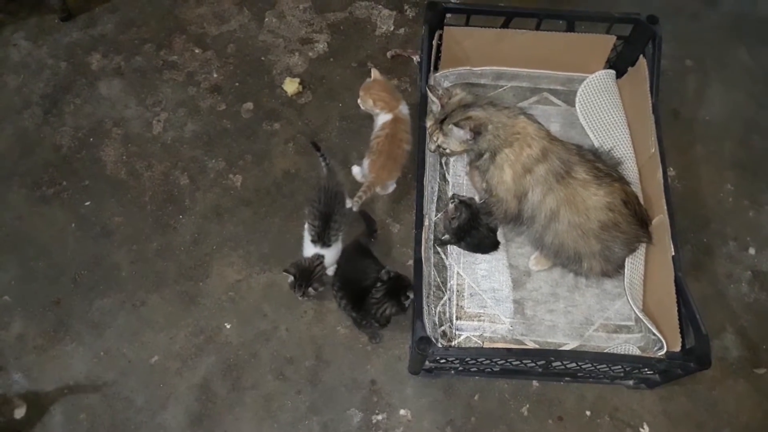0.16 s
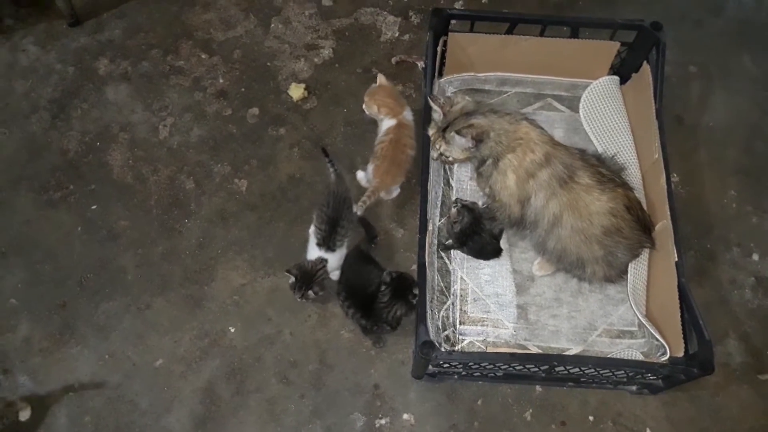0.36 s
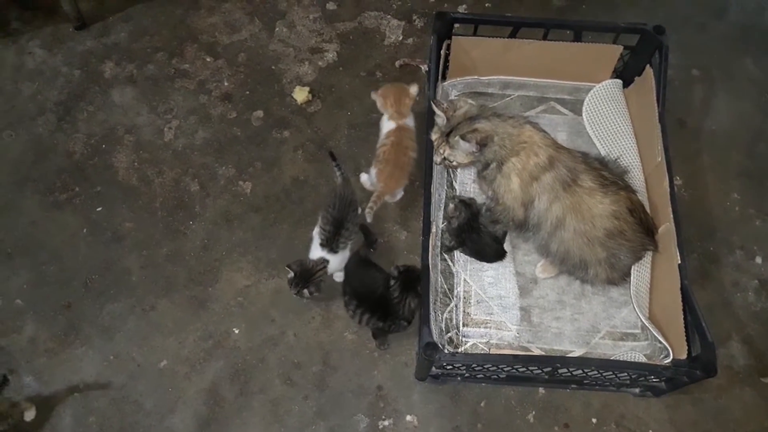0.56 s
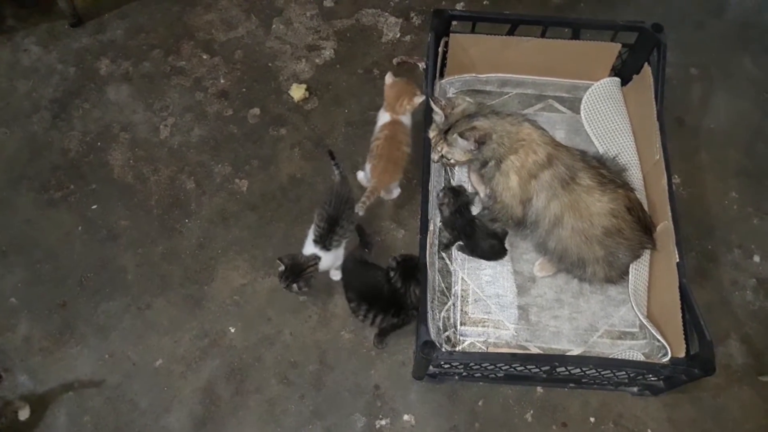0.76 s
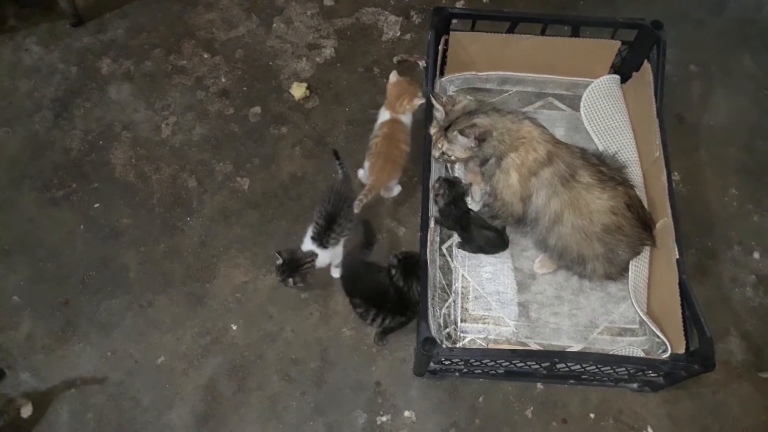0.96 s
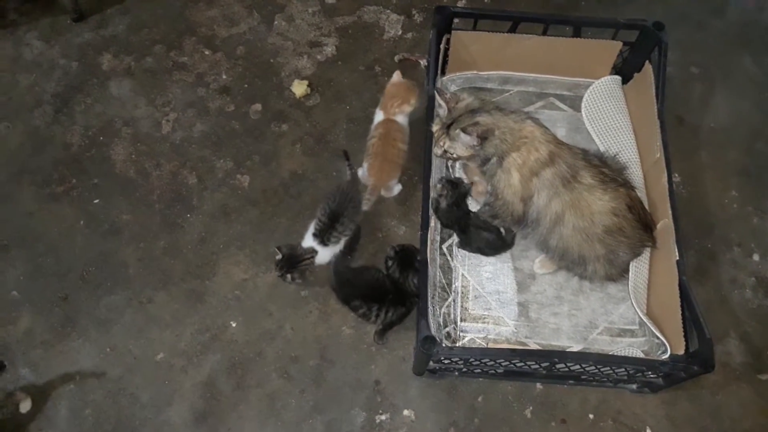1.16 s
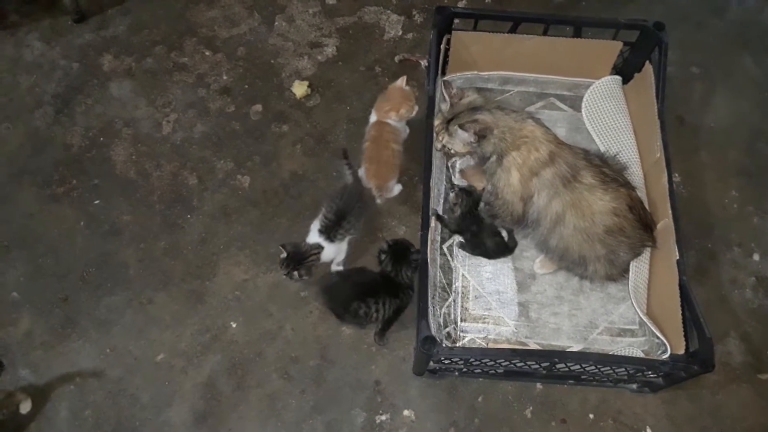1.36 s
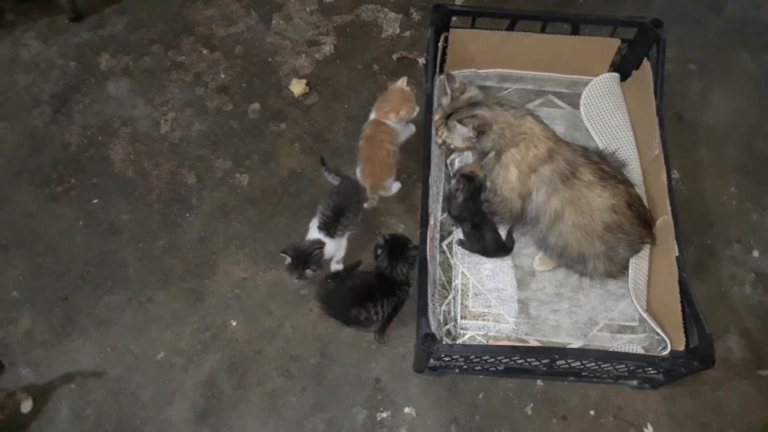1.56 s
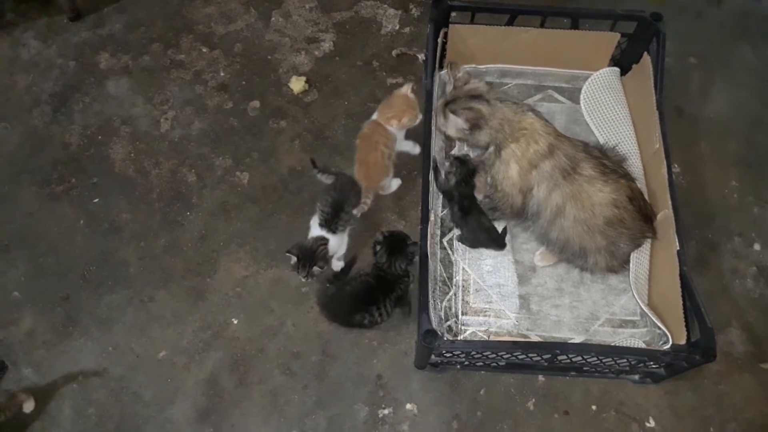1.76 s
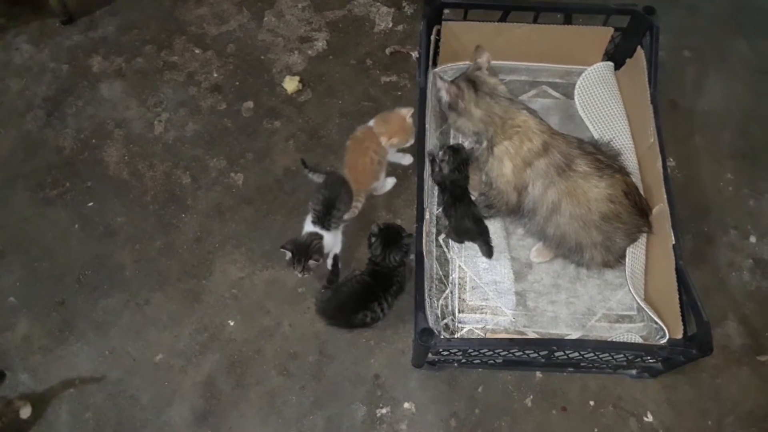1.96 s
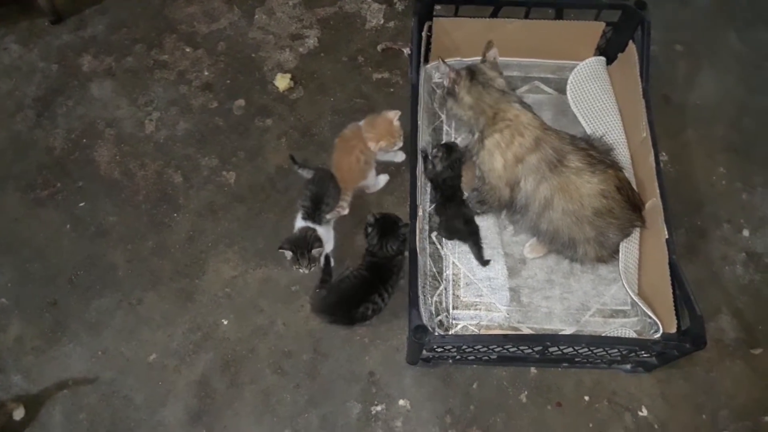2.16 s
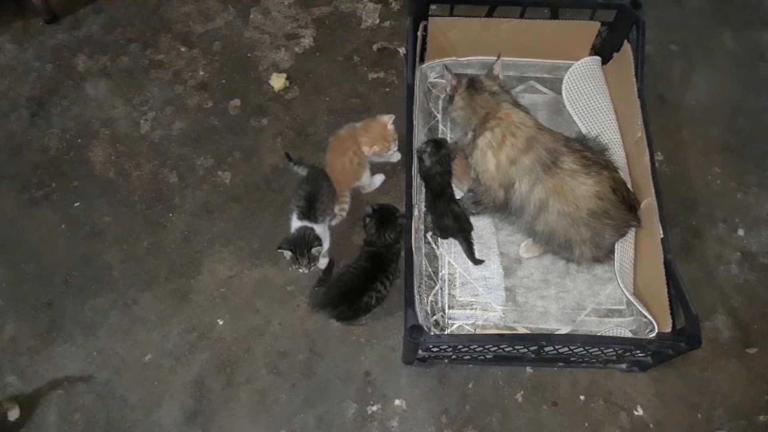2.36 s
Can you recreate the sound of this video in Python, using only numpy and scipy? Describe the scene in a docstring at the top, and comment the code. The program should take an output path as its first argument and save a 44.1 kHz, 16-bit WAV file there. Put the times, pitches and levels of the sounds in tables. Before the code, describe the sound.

Kittens mewing in a bare hard-floored room: a high piercing mew overlapped by a lower one, a very faint one, soft bedding rustle and paw bumps, then a sharp claw scrape running into a hoarse mew.

```python
"""Kittens mew on a hard floor beside a lined crate in a bare room: two mews overlap, a faint one follows,
then claws scrape the lining and a hoarse mew comes out of the scrape. Mews are stacks of jittering
harmonics plus air noise; claws are noise broken into short catches and snags. Bedding rustles as soft
noise, paws push the crate's ringing modes, and filtered noise makes the low room hum and microphone hiss."""
import sys
import numpy as np
from scipy import signal
from scipy.fft import rfft, irfft
from scipy.io import wavfile

SR = 44100
rng = np.random.default_rng(int(sys.argv[2]) if len(sys.argv) > 2 else 0)


def to_wav(s):
    """Save 16-bit WAV."""
    ch = np.atleast_2d(s).T  # columns
    pcm = np.round(np.clip(ch, -1, 1) * 32767)  # PCM
    wavfile.write(sys.argv[1], SR, pcm.astype(np.int16))


N = 105840  # 2.4 s

# Steady room hum and microphone hiss, then a faint separate noise, opposite in left and right.
# Each row: frequency in Hz, relative level in dB.
HUM_SPECTRUM = [(25, -21), (60, -6), (110, 3), (150, -2), (250, -14), (400, -20.5), (800, -16),
                (1500, -18.5), (2800, -21.5), (4800, -20.5), (6500, -24.5), (8000, -28.5), (10500, -30.5),
                (12500, -24.5), (14200, -21), (15800, -17.5)]
SIDE_NOISE_SPECTRUM = [(25, -12), (120, 0.5), (300, -5), (700, -8), (2000, -14), (8000, -6.5),
                       (15800, -5.5)]
HUM_DB, SIDE_NOISE_DB = -67.5, -12.5  # side noise relative to the hum and hiss
# Coming and going of the low rumble. Each row: time in seconds, level in dB relative to STIR_DB.
STIR_LEVELS = [(0, 6.5), (.4, 2), (.75, -1), (.88, 11.5), (1.0, 9.5), (1.3, 0), (1.37, 7), (1.42, -1.5),
               (1.56, 13), (1.62, 5), (1.7, -4), (1.9, -2.5), (2.4, 1.5)]
STIR_LOW_HZ, STIR_HIGH_HZ, STIR_DB = 189, 465, -78

ROOM_T60_S, ROOM_TREBLE_T60_S, ROOM_TREBLE_DB = 0.34, 0.27, 2
ROOM_DB, WALL_CUT_HZ = -12, 3000  # echo level; split between low and treble echoes
CUTOFF_HZ = 15860

# Paws on the crate. Each row: start in seconds, strength of the push in dB.
PAW_PATS = [(1.3771, -44.5), (1.5781, -50)]
# Modes of the crate. Each row: frequency in Hz, relative level in dB, 60 dB decay in seconds.
CRATE_MODES = [(227.9, -9, 0.12), (309, 3, 0.17), (400, -5, 0.09), (560, 1, 0.048), (690, 0.5, 0.029),
               (1340, -6.5, 0.087)]
PAD_HZ = 1300  # upper edge of the soft push

# Soft shifting of the bedding. Each row: time in seconds, level in dB.
RUSTLE_LEVELS = [(.9, -70), (.96, -71.5), (1.2, -72.5), (1.25, -71), (1.29, -63), (1.33, -60.5),
                 (1.38, -57.5), (1.44, -68), (1.5, -67), (1.6, -113)]
# Colour of the bedding noise. Each row: frequency in Hz, relative level in dB.
BEDDING_SPECTRUM = [(1000, -10.5), (1400, -5), (1700, -5), (2100, -13.5), (3300, -12.5), (4300, -2),
                    (4900, -7.5), (5650, -1.5), (6400, -9.5), (8300, -4.5), (10300, -19.5), (14000, -12.5),
                    (15800, -5)]

# Claws snagging. Each row: start in seconds, strength in dB, pitch in Hz, 60 dB decay in seconds.
CLAW_SNAGS = [(1.126, -50.5, 2484, 0.013), (1.126, -52, 1850, 0.011), (1.145, -60.5, 2370, 0.066),
              (1.758, -40, 2380, 0.031), (1.762, -41, 4350, 0.022), (1.769, -40, 7200, 0.025),
              (1.781, -37.5, 5330, 0.016), (1.79, -33, 5150, 0.026), (1.7996, -33.5, 4270, 0.037),
              (1.798, -36, 13800, 0.017), (1.8045, -32.5, 5340, 0.017), (1.806, -39, 13900, 0.018),
              (1.813, -43, 1700, 0.016), (1.8205, -29, 15500, .012), (1.823, -40, 4200, 0.017),
              (1.833, -28, 13800, 0.011), (1.848, -30.5, 6820, 0.047), (1.861, -32, 4200, 0.031),
              (1.87, -31.5, 6960, 0.016), (1.909, -33, 2350, 0.049), (1.91, -38, 5700, 0.0067)]
SNAG_WIDTH, SNAG_CRACK_DB = 0.16, -8  # band width as a share of pitch; broad crack relative to the band

# Claws rubbing the lining. Each row: time in seconds, force in dB, treble gain in dB.
SCRAPE_FORCE = [(1.741, -43, -25), (1.745, -51.5, -27), (1.756, -54.5, -22), (1.759, -49.5, 3),
                (1.77, -44, 0), (1.785, -53.5, 4), (1.8, -45.5, 0), (1.815, -41.5, 0.5), (1.84, -41.5, 0.5),
                (1.85, -43.5, -3), (1.875, -45, 0), (1.89, -57, 4), (1.905, -58, 9), (1.93, -57.5, 6),
                (1.98, -67, 2), (2.06, -78, 8), (2.1, -90, 0)]
TREBLE_HZ = 9300  # the treble gain works above this
# Colour of the rubbed lining. Each row: frequency in Hz, relative level in dB.
LINING_SPECTRUM = [(290, -56), (500, -20.5), (878, -8.5), (1000, -9), (1660, -1), (2000, -7), (3770, 0),
                   (4110, -4), (4890, -1.5), (5730, -5), (11300, -11.5), (13600, -19), (15700, -7.5)]
# Broad resonances of the lining. Each row: centre in Hz, width in Hz, relative level in dB.
LINING_RESONANCES = [(850, 340, -5.5), (1700, 560, 0.5), (2410, 200, 2), (4200, 580, 9), (5680, 260, 6.5),
                     (6900, 670, -7), (8500, 1100, 0.5), (13900, 2300, 8)]
RINGS_DB = -5  # resonances relative to the plain rub
CATCHES_PER_S, CATCH_SPREAD_DB, CATCH_S = 500, 3.5, .0012  # rate, scale of uneven strength, decay time
CATCH_SHARE = .55  # weight of the catches; the rest is steady rub

# The four mews. Each row: time in seconds, pitch in Hz, fundamental in dB, second harmonic in dB,
# higher harmonics in dB before the mouth colour, roughness from 0 to 1, air noise in dB.
HIGH_MEW = [(.155, 993.5, -71, -75, -100, 0.09, -95), (.178, 1039, -65, -58.5, -100, .1, -78),
            (.184, 1063, -65.5, -72, -64, 0.17, -83), (.21, 1149, -65.5, -55, -55, 0.2, -64),
            (.24, 1132, -63.5, -50.5, -50, 0.01, -75), (.262, 1212, -64, -52, -51.5, 0, -54),
            (.29, 1325, -71, -40, -57, 0.04, -49.5), (.312, 1335, -55, -33.5, -56.5, 0, -53),
            (.328, 1363, -74, -48, -62, 0, -60), (.36, 1380, -51, -54.5, -65.5, 0.02, -61),
            (.41, 1464, -47, -64, -60, 0, -74), (.416, 1515, -38.5, -75, -63, 0, -79),
            (.426, 1706, -56, -81, -65.5, 0, -74), (.44, 1712, -50, -85, -61.5, .04, -83),
            (.47, 1715, -50.5, -79, -60.5, 0, -80), (.5, 1712, -46, -73, -64.5, 0.02, -89),
            (.57, 1700, -60.5, -73, -67.5, 0, -90), (.63, 1671, -62.5, -84, -64, 0.01, -100),
            (.7, 1607, -44.5, -73, -74, 0, -88), (.765, 1560, -41, -67, -76, 0.01, -98),
            (.785, 1537, -45, -62, -82, 0.01, -92), (.797, 1581, -47.5, -79, -80, 0, -95),
            (.812, 1525, -53, -67, -80, 0.01, -95), (.84, 1479, -44.5, -71, -87, 0.07, -93),
            (.875, 1431, -49, -74, -75, 0.13, -92), (.9, 1355, -47.5, -85, -73, 0, -92),
            (.918, 1260, -41, -87, -83, 0.04, -85), (.945, 1203, -66.5, -88, -86, 0.3, -85),
            (.965, 1203, -72, -96, -97, .4, -95), (1.0, 1300, -74, -103, -100, .4, -99),
            (1.06, 1277, -73, -99, -105, 0.53, -99)]
LOW_MEW = [(.48, 850, -76, -78, -79, 0.16, -90), (.5, 870, -66.5, -65, -101, 0.1, -86),
           (.536, 935, -73, -56, -67.5, 0.072, -78), (.546, 965, -59.5, -66, -67.5, 0.17, -65),
           (.549, 1144, -65, -59, -59.5, 0.035, -68), (.575, 1131, -66.5, -52, -60, 0.012, -72),
           (.591, 1162, -58.5, -52.5, -56, 0.011, -81), (.631, 1114, -56.5, -49, -60.5, 0.022, -79),
           (.663, 1103, -57.5, -51.5, -61.5, 0.021, -86), (.675, 1084, -58, -52, -61, 0.033, -79),
           (.705, 1105, -58, -51.5, -63, 0.027, -81), (.749, 1034, -68, -57, -62, 0.025, -68),
           (.77, 1050, -86, -55, -64, 0.068, -82), (.775, 1153, -73, -52, -67, 0.1, -59),
           (.801, 1087, -61, -61, -68.5, 0.1, -66), (.843, 1116, -65, -62, -72.5, 0.14, -63),
           (.865, 1115, -80, -78, -75.5, 0.66, -69), (.9, 1127, -89, -93, -78, 1, -68),
           (.93, 1085, -88, -91, -84, 1, -76)]
FAINT_MEW = [(1.435, 1680, -77, -99, -99, .7, -99), (1.455, 1718, -67, -99, -102, .5, -99),
             (1.5, 1699, -75, -102, -111, 0.36, -99), (1.575, 1772, -76, -93, -110, 0.53, -99),
             (1.655, 1700, -90, -99, -99, 0.57, -99)]
HOARSE_MEW = [(1.77, 800, -82, -60, -65, 0.85, -80), (1.8, 798.8, -65, -50.5, -59, 0.75, -82),
              (1.82, 815.6, -60.5, -57, -70, 0.61, -66), (1.86, 838.2, -51.5, -62, -54, 0.78, -57),
              (1.89, 929, -60, -56, -56, 0.96, -73), (1.94, 942.4, -56, -60, -64.5, 0.97, -58.5),
              (1.98, 924.5, -60, -54.5, -64, 0.27, -61), (2.006, 947, -83, -52, -63, 0.12, -70),
              (2.016, 944, -53, -85, -71, .5, -71), (2.024, 870.4, -74, -58, -64, 0.31, -76),
              (2.04, 930, -62, -61, -66, 0.38, -72), (2.05, 891, -70, -57.5, -68, 0.42, -74),
              (2.062, 916, -65.5, -56, -65, 0.15, -83), (2.1, 825.5, -68.5, -58.5, -70.5, 0.11, -92),
              (2.122, 837, -74, -60, -70.5, .2, -75), (2.14, 785.6, -72, -53.5, -78, 0.13, -69),
              (2.15, 789, -89, -85, -78, 0.41, -78), (2.158, 893, -93, -55.5, -76.5, 0.52, -79),
              (2.174, 850, -86, -64, -71, 0.75, -88), (2.18, 776, -75, -63, -74, 0.22, -85),
              (2.188, 771, -84, -53.5, -84, 0.081, -70), (2.198, 829, -87, -54, -82, 0.14, -80),
              (2.206, 813, -92, -81, -78, 0.7, -80), (2.252, 791, -88, -75, -94, 0.59, -79),
              (2.28, 797, -96, -95, -89, 0.53, -97)]
# Mouth colour of the higher harmonics; the low and faint mews share one. Each row: frequency in Hz, gain in dB.
HIGH_MOUTH = [(3000, -15.5), (3600, 6), (4500, -26), (5100, -20), (5700, -10), (6300, -1.5), (6850, -3),
              (7500, 3), (8400, 1.5), (9300, -15), (10000, -9.5), (11500, -11.5), (13000, -29),
              (16000, -50)]
LOW_MOUTH = [(3000, 4), (4400, 6.5), (5500, 3.5), (6700, 4.5), (7900, -4.5), (9000, -27), (15000, -61)]
HOARSE_MOUTH = [(2400, 4), (3100, -11.5), (3700, -6.5), (4300, -8), (4800, -4.5), (5400, 5), (6200, -6),
                (7300, -5.5), (9000, -23), (15000, -42)]
# Air noise through a kitten's mouth. Each row: frequency in Hz, relative level in dB.
BREATH_SPECTRUM = [(1200, -54), (1500, -30), (2100, -16), (2750, -31.5), (3100, 1), (3600, 13), (4300, -6),
                   (5300, 8.5), (6200, 4), (7200, 4), (8500, -0.5), (10500, -19), (15800, -22)]
JITTER, ROUGH_JITTER, JITTER_HZ = 0.00463, .03, 65.2  # shares of pitch: always, added at full roughness; speed
WAVER_DB, WAVER_HZ, RASP_HZ = 0.5, 73, 324  # level waver and its speed; speed of the roughness
UNEVEN_DB, UNEVEN_HZ = 5, 9  # separate swell of each higher harmonic at full roughness
# The top harmonics fade faster than the others as a mew weakens: extra dB lost per dB below the threshold
SHRILL_HZ, SHRILL_FROM_DB, SHRILL_FOLLOWS = 9700, -56, 1.1
# Top hiss that follows the higher harmonics
SIZZLE_LOW_HZ, SIZZLE_HIGH_HZ, SIZZLE_DB = 12800, 16000, -14


def amp(db):
    """Decibels to a linear gain."""
    return 10 ** (np.asarray(db) / 20)


def rms_one(x):
    """Scale a signal to rms 1."""
    return x / np.sqrt(np.mean(x ** 2) + 1e-20)


def white():
    """White noise over the whole scene."""
    return rng.standard_normal(N)


def in_time(rows):
    """Draw a table's columns over time, after a gate that is 1 inside its span with 4 ms ramps."""
    s, *columns = np.transpose(rows)
    t = np.arange(N) / SR
    gate = np.clip(np.minimum(t - s[0], s[-1] - t) / .004, 0, 1)
    return [gate] + [np.interp(t, s, c) for c in columns]


def at_hz(points, hz):
    """Read a spectrum in dB at any frequency, along a log frequency axis."""
    table = np.array(points)
    return np.interp(np.log(hz), np.log(table[:, 0]), table[:, 1])


def drift(corner_hz):
    """Slow random wandering of rms 1: noise passed twice through a one-pole low-pass."""
    r = np.exp(-2 * np.pi * corner_hz / SR)
    noise = rng.standard_normal(N + SR)
    settled = signal.lfilter([1], [1, -2 * r, r * r], noise)[SR:]
    return rms_one(settled)


def colour(x, spectrum):
    """Shape a signal by a spectrum, with nothing far below its first point; rms 1."""
    hz = np.maximum(np.arange(N // 2 + 1) * SR / N, 1)
    gain = amp(at_hz(spectrum, hz)) * (hz > .7 * spectrum[0][0])
    return rms_one(irfft(rfft(x) * gain, N))


def band(x, low_hz, high_hz):
    """Keep one band of a signal."""
    edges = [low_hz, min(high_hz, .45 * SR)]
    return signal.sosfilt(signal.butter(2, edges, "band", fs=SR, output="sos"), x)


def split_at(x, hz, order):
    """Low and high parts of a signal."""
    return [signal.sosfilt(signal.butter(order, hz, kind, fs=SR, output="sos"), x) for kind in ("low", "high")]


def ring(push, hz, t60):
    """A mode struck by a push: a unit click sets a sine of height 1 ringing down."""
    r, w = amp(-60 / (t60 * SR)), 2 * np.pi * hz / SR
    return signal.lfilter([0, np.sin(w)], [1, -2 * r * np.cos(w), r * r], push + 1e-18)


def click(s, db):
    """A single-sample click."""
    out = np.zeros(N)
    out[int(s * SR)] = amp(db)
    return out


def floor():
    """Steady hum and hiss, the same on both sides, a faint noise opposite in left and right, a varying rumble."""
    hum = colour(white(), HUM_SPECTRUM)
    side_noise = colour(white(), SIDE_NOISE_SPECTRUM)
    _, swell_db = in_time(STIR_LEVELS)
    rumble = rms_one(band(white(), STIR_LOW_HZ, STIR_HIGH_HZ))
    rumble = rumble * amp(STIR_DB + swell_db + 2.6 * drift(4.7))
    left_right = np.array([[1], [-1]])
    return rumble + amp(HUM_DB) * (hum + amp(SIDE_NOISE_DB) * side_noise * left_right)


def room(x):
    """Echoes as decaying noise after a 4 ms gap; the treble dies sooner."""
    t = np.arange(SR) / SR
    low, high = split_at(rng.standard_normal(SR), WALL_CUT_HZ, 2)
    low_tail = rms_one(low) * amp(-60 * t / ROOM_T60_S)
    high_tail = rms_one(high) * amp(ROOM_TREBLE_DB - 60 * t / ROOM_TREBLE_T60_S)
    tail = (low_tail + high_tail) * (t > .004)
    tail = tail / np.sqrt(np.sum(tail ** 2))
    return amp(ROOM_DB) * signal.fftconvolve(x, tail)[:N]


def pats():
    """A paw's soft push is heard directly and sets the modes of the crate ringing."""
    push = band(sum(click(s, db) for s, db in PAW_PATS), 150, PAD_HZ)
    modes = sum(amp(db - 12.5) * ring(push, hz, t60) for hz, db, t60 in CRATE_MODES)
    return modes + 8.5 * push


def rustle():
    """Bedding shifts as a soft swell of friction noise with an unsteady level."""
    gate, level_db = in_time(RUSTLE_LEVELS)
    return gate * amp(level_db + 1.42 * drift(21)) * colour(white(), BEDDING_SPECTRUM)


def snags():
    """Each claw snag is a dying burst of noise in a band of its own, with a broad crack."""
    t, out = np.arange(N) / SR, 0
    crack = amp(SNAG_CRACK_DB) * colour(white(), LINING_SPECTRUM)
    for s, db, hz, t60 in CLAW_SNAGS:
        noise = rms_one(band(white(), hz * (1 - SNAG_WIDTH / 2), hz * (1 + SNAG_WIDTH / 2)))
        decay_db = 60 * np.clip(t - s, 0, 1) / t60
        out = out + (t >= s) * amp(db - 6 - decay_db) * (noise + crack)
    return out


def scrape():
    """Claws catch and slip at random: short bursts of noise over a steady rub, ringing in the lining."""
    gate, force_db, treble_db = in_time(SCRAPE_FORCE)
    is_catch = rng.random(N) < CATCHES_PER_S / SR
    catches = is_catch * amp(CATCH_SPREAD_DB * np.minimum(rng.exponential(1, N), 3))
    bursts = rms_one(signal.lfilter([1], [1, -np.exp(-1 / (CATCH_S * SR))], catches))
    rub = white() * (CATCH_SHARE * bursts + 1 - CATCH_SHARE)
    rings = sum(amp(db) * rms_one(band(rub, hz - width / 2, hz + width / 2))
                for hz, width, db in LINING_RESONANCES)
    sound = rms_one(colour(rub, LINING_SPECTRUM) + amp(RINGS_DB) * rms_one(rings))
    low, high = split_at(sound, TREBLE_HZ, 4)
    return gate * amp(force_db) * (low + amp(treble_db) * high)


def mew(rows, mouth):
    """Harmonics of a jittering pitch, which roughness spreads into noise, more so higher up; air noise on top."""
    gate, pitch, first_db, second_db, upper_db, rough, breath_db = in_time(rows)
    rough = np.clip(rough, 0, 1)
    jitter = (JITTER + ROUGH_JITTER * rough) * drift(JITTER_HZ)
    phase = 2 * np.pi * np.cumsum(pitch * (1 + jitter)) / SR
    rasps = [drift(RASP_HZ) for _ in range(4)]
    wavers = [drift(WAVER_HZ) for _ in range(3)]
    breath = amp(breath_db + WAVER_DB * wavers[0]) * colour(white(), BREATH_SPECTRUM)
    sizzle = amp(upper_db + SIZZLE_DB) * rms_one(band(white(), SIZZLE_LOW_HZ, SIZZLE_HIGH_HZ))
    out = breath + sizzle
    for k in range(1, 15):
        hz = k * pitch
        if k == 1:
            level_db = first_db
        elif k == 2:
            level_db = second_db
        else:
            level_db = upper_db + at_hz(mouth, hz) + UNEVEN_DB * np.sqrt(rough) * drift(UNEVEN_HZ)
        shrill_db = SHRILL_FOLLOWS * np.minimum(upper_db - SHRILL_FROM_DB, 0) * (hz > SHRILL_HZ)
        level_db = level_db + shrill_db + WAVER_DB * wavers[k % 3]
        noise_share = np.clip(rough * (.6 + k / 10), 0, 1)
        # k * k staggers the starting phases
        cos, sin = np.cos(k * phase + k * k), np.sin(k * phase + k * k)
        raspy = rasps[k % 4] * cos + rasps[(k + 1) % 4] * sin
        tone = np.sqrt(2 - 2 * noise_share) * cos + np.sqrt(noise_share) * raspy
        out = out + amp(level_db) * tone * (hz < .45 * SR)
    return gate * out


def scene():
    """Mews, claws, bedding and paws with their echoes, over the room floor."""
    voices = mew(HIGH_MEW, HIGH_MOUTH) + mew(LOW_MEW, LOW_MOUTH)
    voices = voices + mew(FAINT_MEW, LOW_MOUTH) + mew(HOARSE_MEW, HOARSE_MOUTH)
    near = voices + scrape() + rustle() + snags() + pats()
    return near + room(near) + floor()


def record(dry):
    """A steep low-pass cuts off the top."""
    return signal.sosfilt(signal.ellip(14, .3, 60, CUTOFF_HZ, fs=SR, output="sos"), dry)


dry = scene()
out = record(dry)
to_wav(out)
```